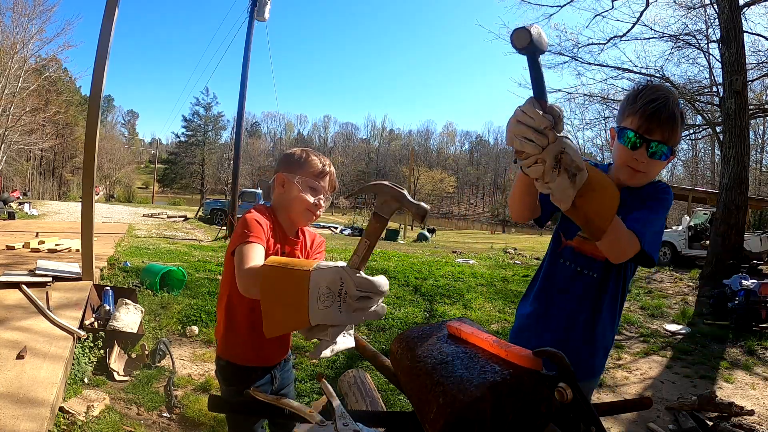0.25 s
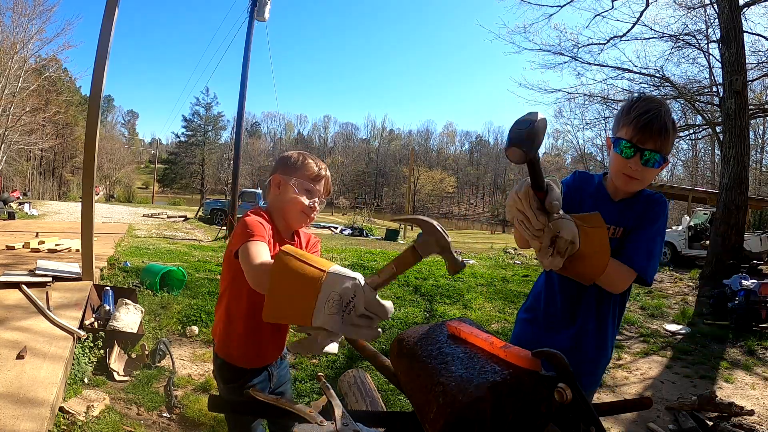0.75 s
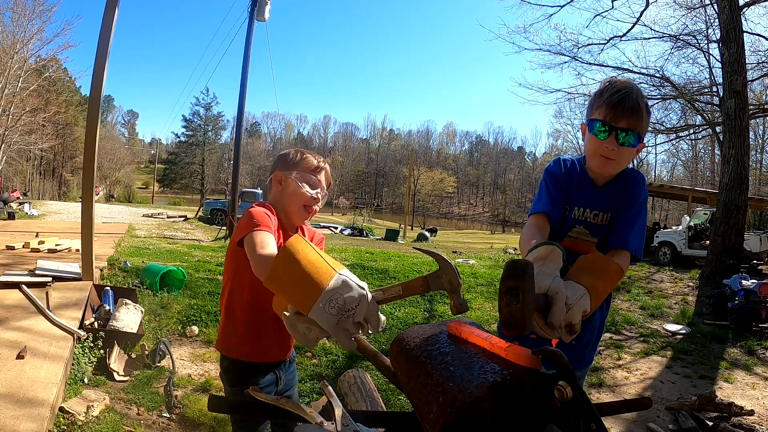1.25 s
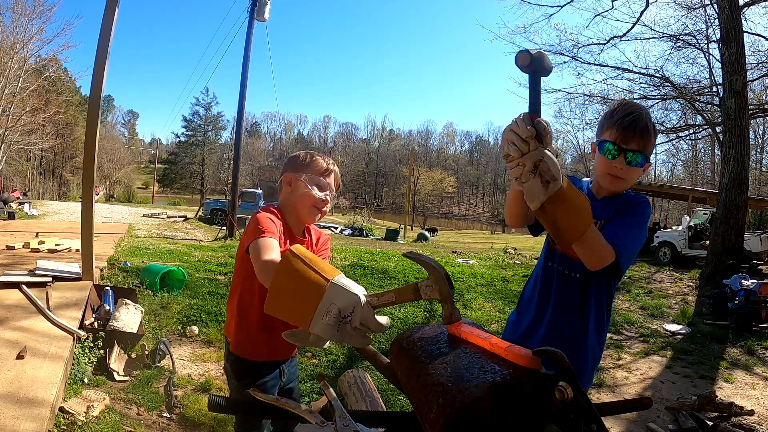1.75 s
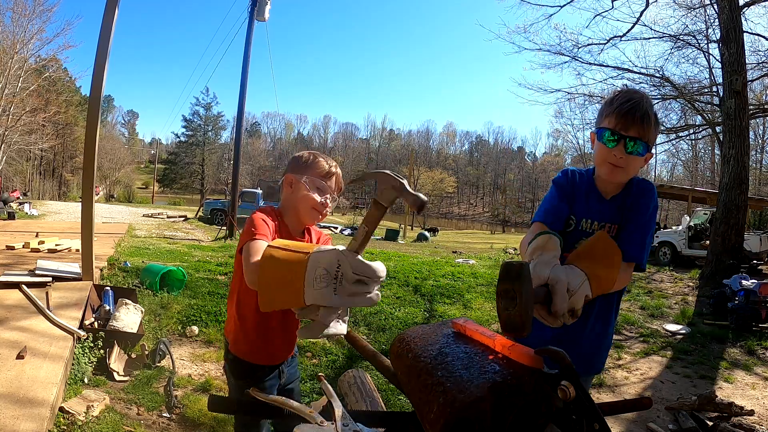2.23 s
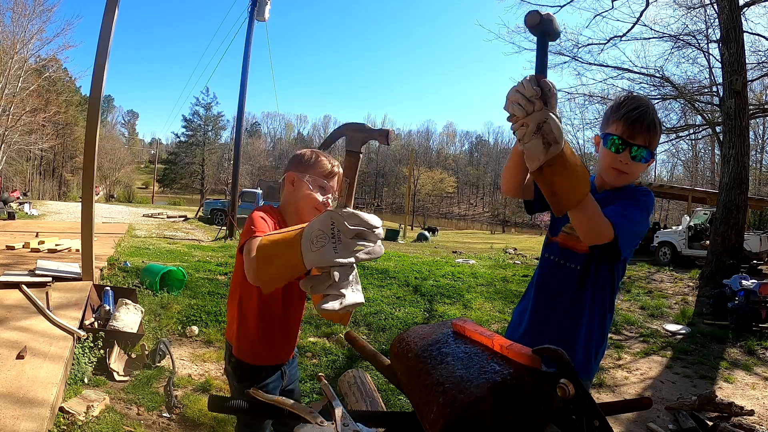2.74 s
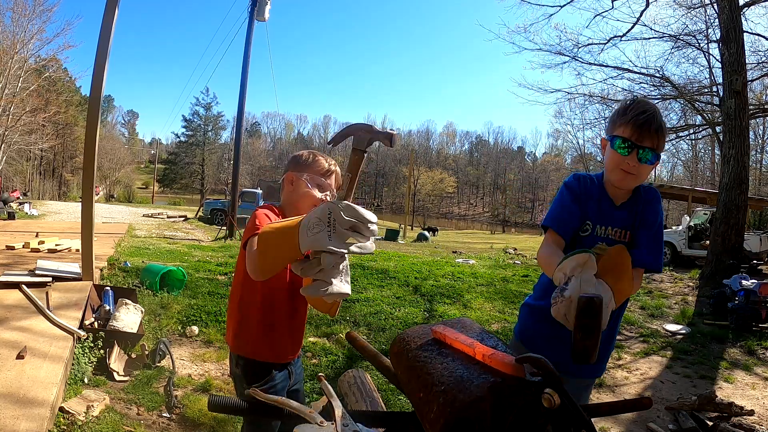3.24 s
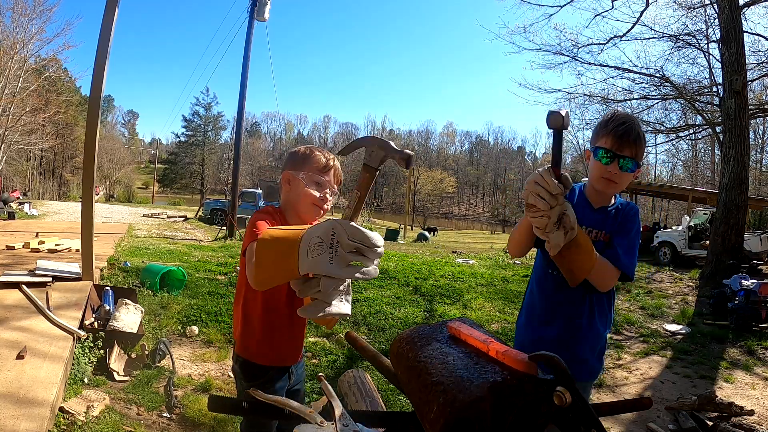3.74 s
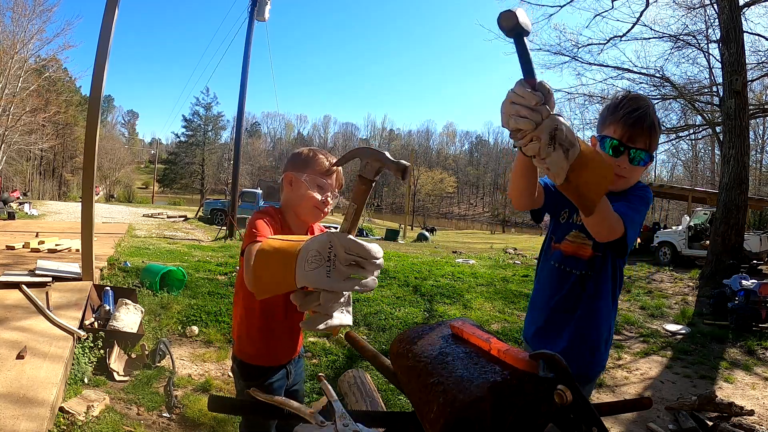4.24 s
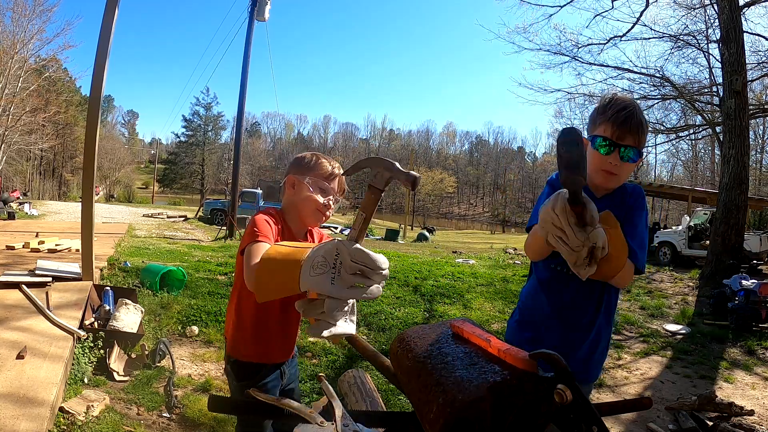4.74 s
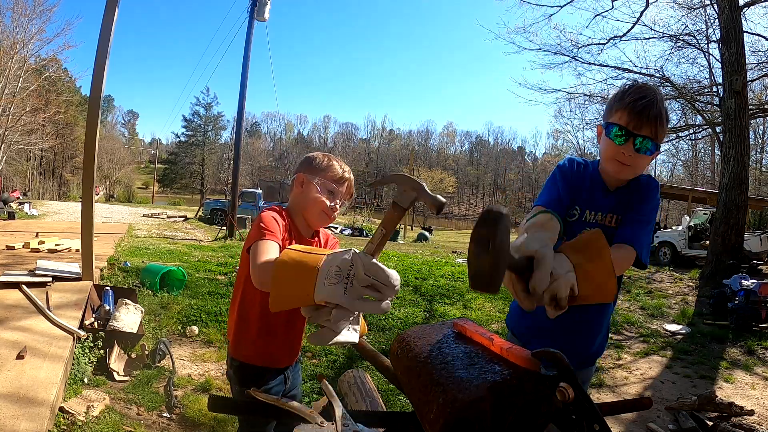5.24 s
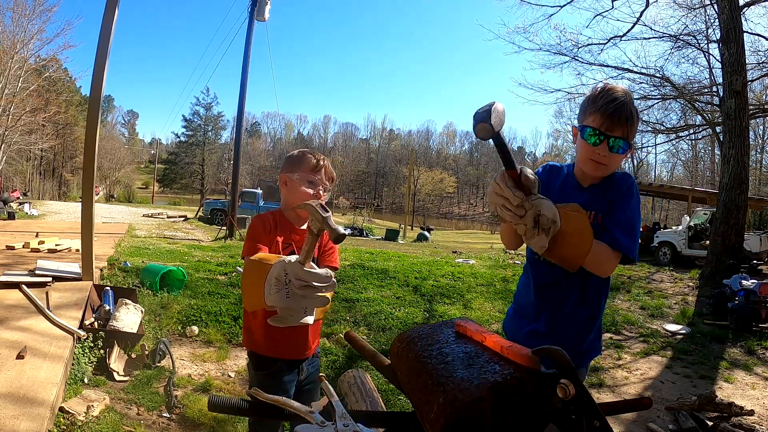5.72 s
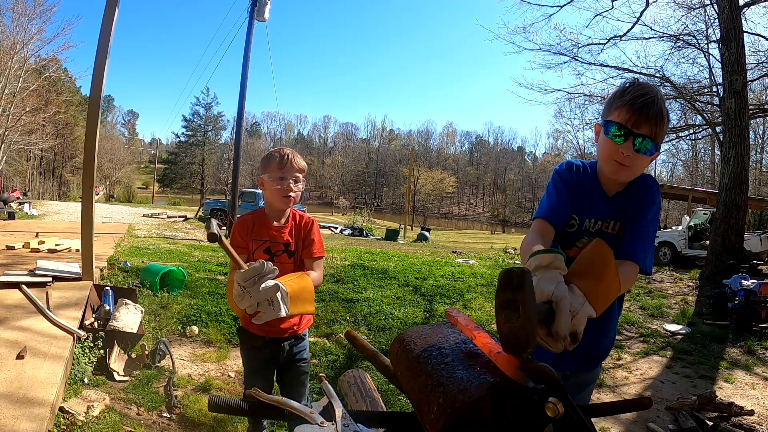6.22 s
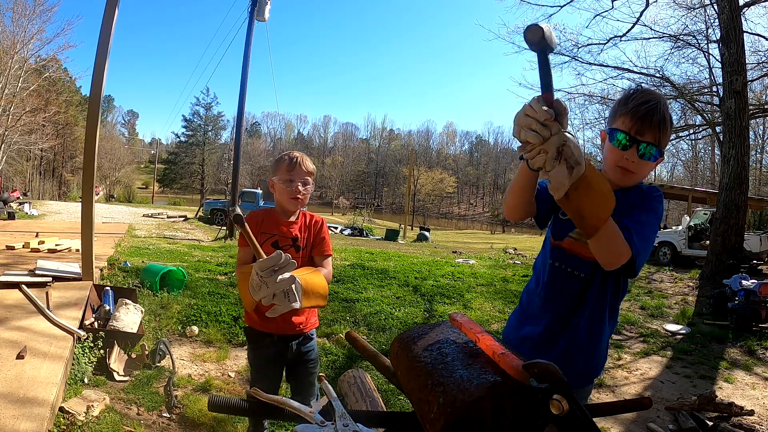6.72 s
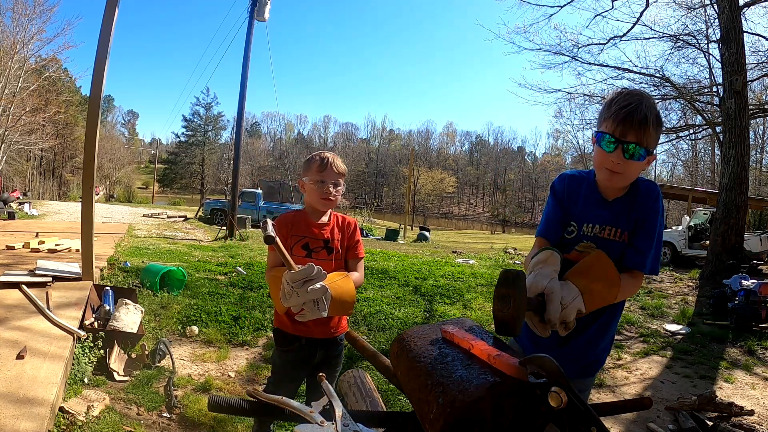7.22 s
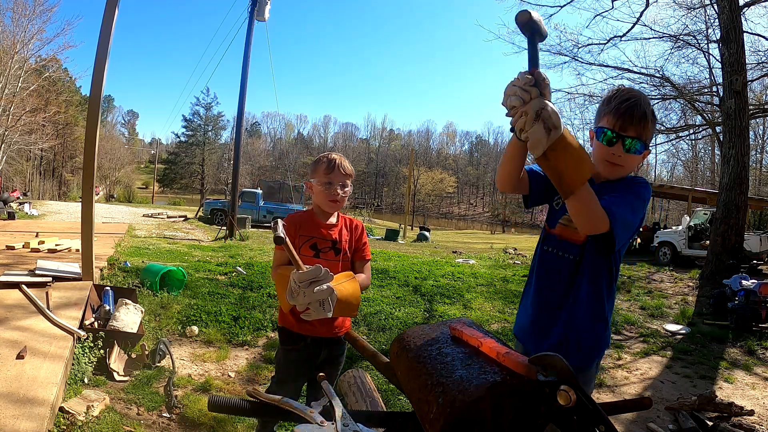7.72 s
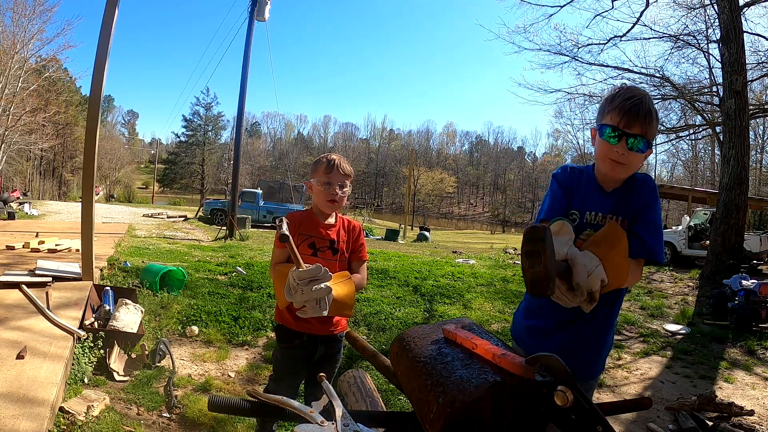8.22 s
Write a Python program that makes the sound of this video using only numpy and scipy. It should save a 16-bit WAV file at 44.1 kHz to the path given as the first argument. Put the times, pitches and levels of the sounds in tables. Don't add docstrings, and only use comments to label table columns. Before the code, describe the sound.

Bright, hard claw-hammer clinks come about twice a second, interleaved with weightier sledge clanks nearly a second apart. Each rings thinly and jars the bar into buzzing clatter on the anvil. Later only the slow sledge remains, leaving more room for the ragged gas flame at the left and soft low gusts on the microphone. Close stereo outdoor pickup, dry, loud peaks squashed, background briefly ducking and swelling back.

```python
import sys
import numpy as np
from scipy import signal
from scipy.fft import rfft, irfft, next_fast_len
from scipy.io import wavfile

SR = 44100
rng = np.random.default_rng(int(sys.argv[2]) if len(sys.argv) > 2 else 0)


def int16_out(signal):
    q = np.round(np.clip(np.atleast_2d(signal).T, -1, 1) * 32767)
    wavfile.write(sys.argv[1], SR, q.astype(np.int16))


def magnitude_from_level(level_db):
    exponent = np.asarray(level_db, float) / 20
    return 10 ** exponent


N = 373527

# pitch_hz, t60_s
MAIN_MODES = [
    (2994, .68),
    (5150, .33),
    (6102, 1.0),
]
# start_s, crack_peak_db, knock_re_crack_db, anvil_low_ring_db, claw_head_ring_db
CLAW = [(0.0264, -7, -8, -38.5, -25.5), (0.4466, -6.5, -21, -37, -26.5), (0.9134, -7.5, -5.5, -50, -29),
        (1.3718, -8, -6.5, -23.5, -31), (1.8978, -9, -3.5, -39, -31), (2.4303, -8, -10.5, -34, -43),
        (2.4715, -10, -9, -47.5, -35), (2.983, -6, -6, -45, -29), (3.0554, -11.5, -28, -47, -37.5),
        (3.5638, -7.5, -7, -48, -31.5), (4.0199, -6.5, -4.5, -39.5, -27.5), (4.478, -11, -1.5, -49, -37),
        (4.5544, -19.5, -13, -36, -37), (4.9599, -5.5, -5.5, -45.5, -30.5), (5.434, -7, -7.5, -37, -30),
        (5.4812, -6.5, -12, -29.5, -32), (5.528, -15.5, -2.5, -34, -32.5)]
# start_s, crack_peak_db, knock_re_crack_db, anvil_low_ring_db, anvil_high_ring_db
SLEDGE = [(0.5104, -9.5, -4.5, -32.5, -33), (1.3519, -9, -34, -54, -35.5), (1.4412, -13.5, -25, -36, -59),
          (2.2743, -10, 2, -35.5, -33.5), (3.1906, -8, -16, -29.5, -28), (3.247, -16.5, -13, -37.5, -44),
          (4.5129, -9.5, 1.5, -46, -28.5), (5.394, -12, -22, -43, -32), (6.3546, -8.5, -4, -34, -27),
          (6.41, -21.5, -17, -46, -49), (7.2415, -11, -1, -33.5, -32.5), (7.445, -39, -8, -56, -74),
          (8.1361, -12, -3, -29, -47), (8.1487, -10.5, -10, -35.5, -46), (8.1916, -18.5, -14, -37, -55)]
# start_s, shimmer_db, middle_db
SHIMMERS = [(0.026, -8, -1), (0.446, 10.5, 7), (0.51, 3.5, 4), (0.914, 8.5, -3), (1.371, 5, -1),
            (2.43, -4, 3), (2.983, 5, -7), (3.056, -30, 2), (3.19, 6, 6.5), (3.563, 8, 10),
            (4.02, -20, -11), (4.513, -7, 3), (4.96, 3, -2), (5.434, 1, 4.5), (5.482, -7, 4.5),
            (5.528, -14, -11), (6.41, -4, 0), (7.243, 16, 0), (8.135, 8, 2), (8.151, 11, 5),
            (8.193, 6.5, 3)]


def in_time(rows):
    s, *columns = np.transpose(rows)
    return [np.interp(np.arange(N) / SR, s, c) for c in columns]


def at_hz(points, hz):
    point_hz, value = np.transpose(points)
    return np.interp(np.log(hz), np.log(point_hz), value)


def drift(rate_hz):
    r = np.exp(-80 * np.pi * rate_hz / SR)
    noise = rng.standard_normal(N // 40 + 2002)
    slow = signal.lfilter([1], [1, -2 * r, r * r], noise)[2000:]
    return np.interp(np.arange(N) / 40, np.arange(len(slow)), slow / slow.std())


def turbulence(spectrum, flicker_db, flicker_hz, count):
    # pitch_hz, correlation
    likeness = [(60, 0.79), (130, 0.97), (290, 0.98), (640, 0.98), (1410, 0.38), (3100, -0.32),
                (6820, -0.25), (15000, 0.04)]
    # pitch_hz, left_minus_right_db
    left_db = [(60, 4), (130, 1.0), (290, 1.5), (640, 11), (1410, 8), (3100, 12.5), (6820, 6), (15000, 7.5)]
    size = next_fast_len(N)
    hz = np.maximum(np.fft.rfftfreq(size, 1 / SR), 1)
    mid, side = rfft(rng.standard_normal((2, size))) * magnitude_from_level(at_hz(spectrum, hz))
    alike = np.clip(at_hz(likeness, hz), -1, 1)
    lean = magnitude_from_level(at_hz(left_db, hz) / 2)
    shared, apart = np.sqrt(1 + alike) * mid, np.sqrt(1 - alike) * side
    both = np.array([lean * (shared + apart), (shared - apart) / lean])
    place = np.interp(np.log(hz), np.log([spectrum[1][0], spectrum[-2][0]]), [0, count - 1])
    out, together = 0, drift(flicker_hz)
    for k in range(count):
        part = irfft(both * np.maximum(1 - abs(place - k), 0), size)[:, :N]
        out = out + part * magnitude_from_level(flicker_db * (0.73 * together + 1.55 * drift(flicker_hz)))
    return out / out.mean(0).std()


def sputter():
    # start_s (lowest point), sag_s,
    # depth_db, flare_db
    sags = [(0.04, 0.016, 16, 4), (0.14, 0.031, 2.5, 3), (0.52, .1, 0.5, -2), (0.78, 0.042, 3.5, -3),
            (0.99, 0.067, 8, 2), (1.13, 0.071, 19, 2.5), (1.58, 0.091, 11, -3), (1.93, 0.083, 3, 1),
            (2.31, 0.15, 3, -0.5), (3.04, 0.084, 2.5, 1), (4.03, 0.039, 3.5, -4), (4.62, 0.12, 1.5, -0.5),
            (5.17, 0.17, 1.5, 1), (5.33, 0.019, 9.5, -4), (5.5, .04, 8, 10.5), (5.59, 0.082, 13, 2),
            (5.71, 0.017, 4.5, 0), (5.99, 0.067, 9.5, 8), (6.2, 0.068, 16, 6), (6.72, 0.028, 10.5, 0),
            (6.96, .05, 10.5, 2.5), (7.67, 0.049, 10, 0), (8.33, .09, 8, 2.5), (8.42, 0.019, 7, 4)]
    catch_s, flare_rise_s, flare_fall_s = 0.035, 0.03, 0.054
    t = np.arange(0, N, 64) / SR
    sag_db, flare_db = 0, 0
    for s, sag_s, depth_db, lift_db in sags:
        sag_db = sag_db - np.interp(t - s, [-sag_s, 0, catch_s], [0, depth_db, 0])
        flare_shape_s = [0, flare_rise_s, flare_rise_s + flare_fall_s]
        flare_db = flare_db + np.interp(t - s, flare_shape_s, [0, lift_db, 0])
    return [np.interp(np.arange(N) / SR, t, v) for v in (sag_db, flare_db)]


def forge(sag_db, flare_db):
    # start_s, level_db
    draught = [(0, -17), (1.2, -15.5), (2.8, -16), (4.4, -15), (5.9, -18.5), (7.2, -16), (8.1, -16.5),
               (8.47, -24.5)]
    # pitch_hz, level_db per Hz
    flame_spectrum = [(65, -27.5), (110, -11.5), (124, -9), (167, 3), (301, -1.5), (345, -10.5), (398, -12),
                      (466, -21), (520, -30.5), (680, -64), (1140, -120)]
    jet_spectrum = [(310, -50), (520, -9.5), (772, -5), (908, -1), (981, -6), (1040, -4), (1190, 1),
                    (1240, -1.5), (1310, -20), (1380, -6.5), (1450, -19), (1880, -24), (3190, -120)]
    hiss_spectrum = [(820, -23.5), (1400, -11), (1510, -5.5), (2320, 3), (2670, 0), (3090, -5),
                     (3340, -5.5), (4000, -10), (5200, -55.5), (8800, -120)]
    air_spectrum = [(2350, -28), (4000, 0.5), (4710, 0.5), (5950, 1.5), (7050, -2), (9250, -14.5),
                    (11900, -17.5), (15500, -33)]
    draught_db, = in_time(draught)
    flame_db = draught_db + sag_db + flare_db
    jet_db = draught_db - 21.5 + 0.87 * sag_db + 1.15 * flare_db
    hiss_db = -50.5 + 0.39 * sag_db + 0.32 * flare_db + 1 * drift(15)
    hiss_db = np.maximum(hiss_db, -56)
    air_db = -51.5 + 0.15 * (hiss_db - hiss_db.mean())
    flame = magnitude_from_level(flame_db + 0.82) * turbulence(flame_spectrum, flicker_db=-0.2, flicker_hz=17, count=2)
    jet = magnitude_from_level(jet_db + 3.0) * turbulence(jet_spectrum, flicker_db=1.0, flicker_hz=26.0, count=3)
    hiss = magnitude_from_level(hiss_db + 5) * turbulence(hiss_spectrum, flicker_db=1.6, flicker_hz=22, count=3)
    air = magnitude_from_level(air_db) * turbulence(air_spectrum, flicker_db=2.4, flicker_hz=17, count=6)
    return flame + jet + hiss + air


def wind(sag_db, flare_db):
    # start_s, level_db
    gusts = [(0.0, -29), (0.21, -31.5), (1.67, -27.5), (1.82, -35), (5.02, -34.5), (5.35, -26.5),
             (6.51, -28), (6.56, -21), (6.65, -26.5), (6.75, -23), (6.89, -31.5), (7.05, -28), (7.19, -37),
             (7.45, -28.5), (7.55, -45), (7.6, -24), (7.88, -31.5), (8.47, -25)]
    # pitch_hz, level_db per Hz
    buffet_spectrum = [(12, -40), (20, -18), (70, 0.5), (125, 0), (160, -38.5), (280, -120)]
    gust_db = in_time(gusts)[0] + 2.5 - 0.19 * sag_db + 0.74 * flare_db
    lump_db = 2 * drift(9.5)
    return magnitude_from_level(gust_db + lump_db) * turbulence(buffet_spectrum, flicker_db=-1.5, flicker_hz=3.5, count=2)


def contacts():
    rows = [(s, 0, *rest) for s, *rest in CLAW] + [(s, 1, *rest) for s, *rest in SLEDGE]
    s, hammer, *columns = np.transpose(sorted(rows))
    return s, hammer.astype(int), *columns


def since_last(seconds):
    t = np.arange(N) / SR
    last = np.maximum(np.searchsorted(seconds, t, "right") - 1, 0)
    age_s = t - seconds[last]
    return last, np.where(age_s < 0, 9, age_s)


def listed(rows, s):
    out = np.zeros((len(rows[0]) - 1, len(s)))
    for when_s, *extra_db in rows:
        out[:, np.argmin(abs(s - when_s))] = extra_db
    return out


def band(x, low_hz, high_hz):
    edges_hz = np.clip([low_hz, high_hz], 10, .45 * SR)
    return signal.sosfilt(signal.butter(2, edges_hz, "band", fs=SR, output="sos"), x)


def bar_modes(burst, last):
    # pitch_hz, width_hz, level_db
    modes = [(2085, 140, 3), (3176, 52, 0.5), (4310, 33, 3.5)]
    out = 0
    for hz, width_hz, level_db in modes:
        r = np.exp(-np.pi * width_hz / SR)
        strength = magnitude_from_level(level_db + 4 * rng.standard_normal(len(CLAW + SLEDGE)))[last]
        zeros = [(1 - r * r) / 2, 0, (r * r - 1) / 2]
        poles = [1, -2 * r * np.cos(2 * np.pi * hz / SR), r * r]
        out = out + signal.lfilter(zeros, poles, burst * strength + 1e-18)
    return out


def cracks():
    s, hammer, peak_db, knock_db, *_ = contacts()
    thud_db = np.take((-23, -2), hammer)
    edge_db = np.take((-17, -20.5), hammer)
    last, age_s = since_last(s)
    hit = (age_s / 0.0014) * np.exp(1 - age_s / 0.00043)
    shape = hit + magnitude_from_level(-16.5) * np.exp(-age_s / 0.0077)
    burst = magnitude_from_level(1.57 * peak_db[last] + 17.5) * shape * rng.standard_normal(N) + 1e-18
    thud = band(burst * magnitude_from_level(thud_db[last] + 13.5), 594, 1080)
    knock = band(burst * magnitude_from_level(knock_db[last] + 13.0), 1120, 1786)
    body = band(burst, 1990, 4530)
    edge = band(burst * magnitude_from_level(edge_db[last] - 0.5), 4200, 8400)
    return band(thud + knock + body + edge + bar_modes(burst, last), 100, 11000)


def ring_levels():
    # start_s, extra_db
    high_catches = [
        (0.914, 6),
        (1.371, 34),
        (1.897, -7),
        (3.056, 6),
        (3.563, -25),
        (4.96, 5),
        (5.434, 9),
        (5.482, -8),
    ]
    s, hammer, peak_db, _, low_db, own_db = contacts()
    shimmer_db, extra_middle_db = listed(SHIMMERS, s)
    high_t60_s, head_t60_s = MAIN_MODES[1][1], MAIN_MODES[2][1]
    high_db, head_db = np.full((2, len(s) + 1), -90.)
    woken_db = peak_db - 39 - 0.51 * (low_db + 42) + listed(high_catches, s)[0]
    for k, gap_s in enumerate(np.diff(s, prepend=0)):
        high = high_db[k - 1] - 60 * gap_s / high_t60_s
        head = head_db[k - 1] - 60 * gap_s / head_t60_s
        high_db[k] = max(high - 3, own_db[k] if hammer[k] else woken_db[k])
        head_db[k] = head - 4 if hammer[k] else own_db[k]
    high_db, head_db = high_db[:-1], head_db[:-1]
    swing_db = np.maximum(low_db, high_db) + 36
    middle_db = np.take((-46, -48.5), hammer) + np.take((0.89, 0.85), hammer) * swing_db + extra_middle_db
    top_db = np.take((-55, -62), hammer) + np.take((0.27, 0.7), hammer) * swing_db + shimmer_db
    lag_s = np.take((0.00016, 0.00067), hammer)
    return s + lag_s, hammer == 0, (low_db, high_db, head_db), middle_db, top_db


def rings():
    # pitch_hz, claw_db, sledge_db
    overtones = [(2225, -3, -4), (2579, 1, -3), (3240, -7, -6), (3278, -9, -7), (3982, -8, -2),
                 (4215, -12, -8), (4343, -5, -3), (4645, -1, 0), (5570, -4, -6), (5933, 4, -3),
                 (6333, 2, 1), (6553, -9, -4), (6608, -2, -1), (7285, -2, 1), (7817, 9, 2), (7992, -8, -4),
                 (8096, 0, 0), (8276, -2, 0), (8798, 0, -2), (9100, 1, 3), (9510, -19, -10), (9738, -8, -9),
                 (10090, -4, -4), (10540, -8, -4), (10715, -12, -6), (11740, -9, -8), (12270, -11, -6)]
    s, by_claw, main_db, middle_db, top_db = ring_levels()
    last, age_s = (v[::64] for v in since_last(s))
    modes = [(hz, t60_s, level_db + 4.5 + 1.6 / t60_s) for (hz, t60_s), level_db in zip(MAIN_MODES, main_db)]
    crowd = [(hz, -3 - 0.0008 * max(hz - 9000, 0)) for hz in rng.uniform(2400, 15000, size=48)]
    for k, (hz, *strength_db) in enumerate(overtones + crowd):
        group_db = middle_db + 5.0 if hz < 7000 else top_db + 5.5
        group_db = group_db + np.where(by_claw, strength_db[0], strength_db[-1])
        spot_db = 3 * rng.standard_normal(len(s))
        t60_s = (.5 if k < len(overtones) else .35) * (4000 / hz) ** .7
        modes.append((hz, t60_s, group_db + spot_db))
    hz, t60_s, level_db = (np.array(column) for column in zip(*modes))
    for k, gap_s in enumerate(np.diff(s)):
        carried_db = level_db[3:, k] - 60 * gap_s / t60_s[3:] - 11
        level_db[3:, k + 1] = np.maximum(level_db[3:, k + 1], carried_db)
    turn, step = 2j * np.pi * hz / SR, np.arange(64)
    fade = magnitude_from_level(level_db.T[last] - 60 * age_s[:, None] / t60_s)
    slope = np.diff(fade, axis=0, append=fade[-1:]) / 64
    at_block = np.exp(np.outer(np.arange(0, N, 64), turn))
    lean = magnitude_from_level(0.77 * rng.standard_normal(len(hz)) + 0.5)
    out = []
    for port in (lean * np.exp(-1.5 * turn), 1 / lean):
        inside = port[:, None] * np.exp(np.outer(turn, step))
        blocks = (fade * at_block) @ inside + (slope * at_block) @ inside * step
        out.append(blocks.imag.ravel()[:N])
    return np.array(out)


def clatter():
    # pitch_hz, level_db, t60_s
    bands = [(1530, 13, 0.099), (2410, 13.5, 0.12), (3360, 1.5, 0.21), (5000, 0.5, 0.22), (6600, -13, .25),
             (8150, -45, 0.069), (12000, -22.5, 0.11)]
    # start_s, extra_db
    rattles = [(0.914, 0.5), (1.371, 9), (1.443, -8), (2.275, 2.5), (2.472, -6), (3.056, -1.5), (3.246, -1),
               (4.02, -1.5), (4.513, 2.5), (4.554, -2), (5.482, 3), (6.41, -3), (7.243, 1), (8.135, -3),
               (8.193, -2)]
    s, hammer, peak_db, *_ = contacts()
    clatter_db = np.take((-17, -12.5), hammer) + listed(rattles, s)[0]
    last, age_s = since_last(s)
    shared, left, right = rng.standard_normal((3, N))
    grains = np.array([np.roll(shared, 2) + 0.97 * left, shared + 1.14 * right])
    grains = grains * magnitude_from_level((peak_db + clatter_db)[last] + 2 + 2.0 * drift(83))
    sizzle_db = (np.take((-1.5, 5), hammer) + 0.3 * listed(SHIMMERS, s)[0])[last]
    out = 0
    for hz, level_db, t60_s in bands:
        fade = magnitude_from_level(-60 * age_s / t60_s + sizzle_db * (hz > 6000))
        out = out + magnitude_from_level(level_db) * band(grains * fade + 1e-18, hz / 1.58, hz * 1.19)
    return out


def scene():
    sag_db, flare_db = sputter()
    crack = cracks()
    late = np.interp(np.arange(N) - 1.5, np.arange(N), crack)
    blows = np.array([late, crack]) + rings() + clatter()
    return blows + forge(sag_db, flare_db) + wind(sag_db, flare_db)


def low_pass(x):
    return signal.sosfilt(signal.butter(12, 16600, fs=SR, output="sos"), x)


def record(dry):
    bass = signal.sosfilt(signal.butter(2, 520, fs=SR, output="sos"), dry)
    treble = dry - bass
    climb_db = 115 * np.arange(N) / SR
    level_db = 20 * np.log10(abs(band(dry, 1270, 5800)).max(0) + 1e-9)
    held_peak_db = np.maximum.accumulate(level_db + climb_db) - climb_db
    over_db = np.maximum(held_peak_db + 14, 0)
    r = np.exp(-1 / (0.0021 * SR))
    duck_db = -.85 * signal.lfilter([1 - r], [1, -r], over_db)
    held = magnitude_from_level(duck_db) * treble + magnitude_from_level(0.3 * duck_db) * bass
    limited = 1.069 * np.tanh(held / 0.98)
    top_cut = signal.butter(8, 15000, fs=SR, output="sos")
    ending = np.minimum(np.arange(N)[::-1] / 60, 1)
    return low_pass(ending * signal.sosfilt(top_cut, limited))


dry = scene()
out = record(dry)
int16_out(out)
```